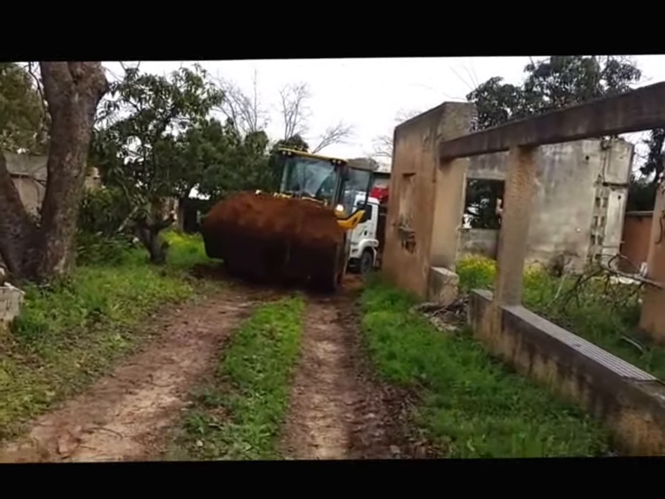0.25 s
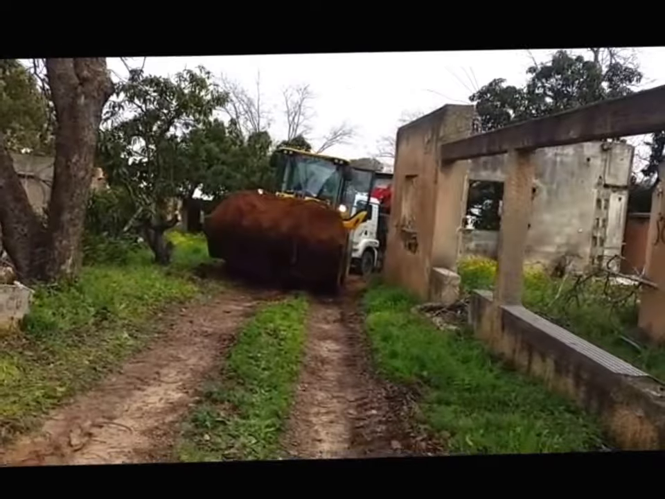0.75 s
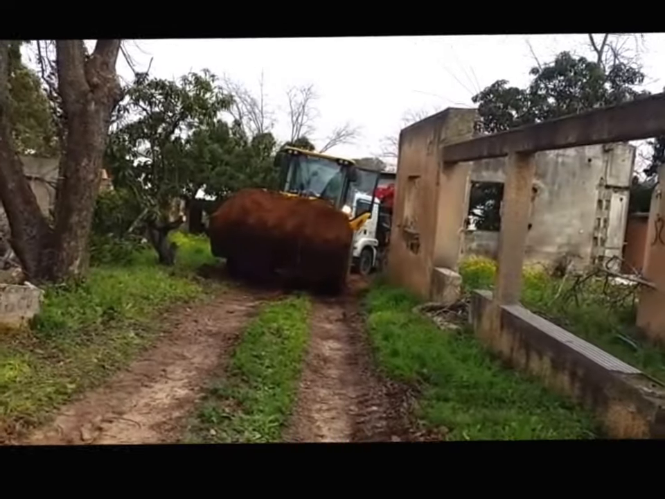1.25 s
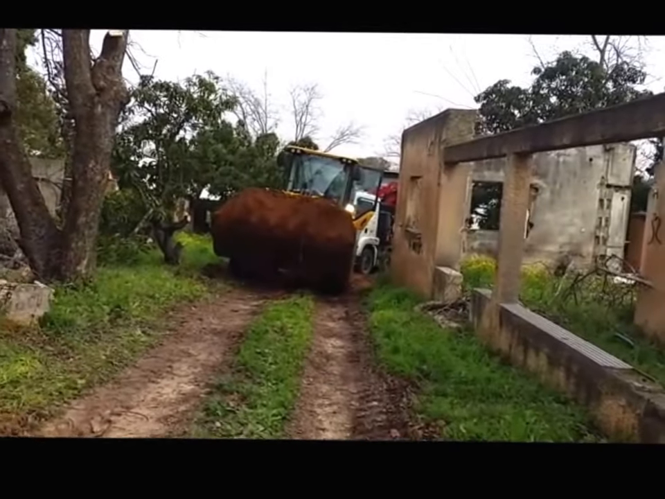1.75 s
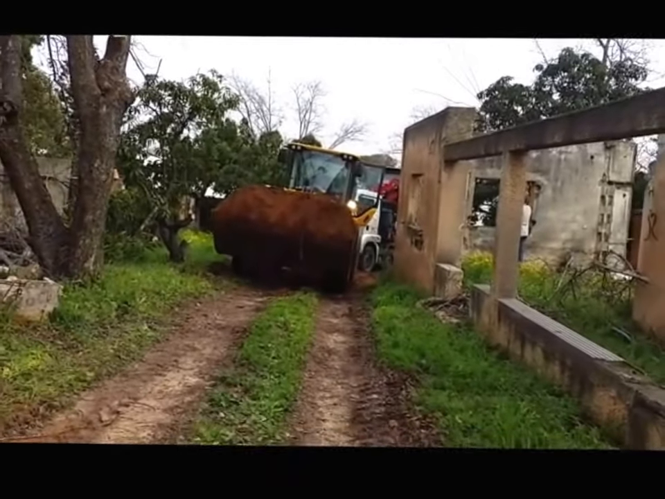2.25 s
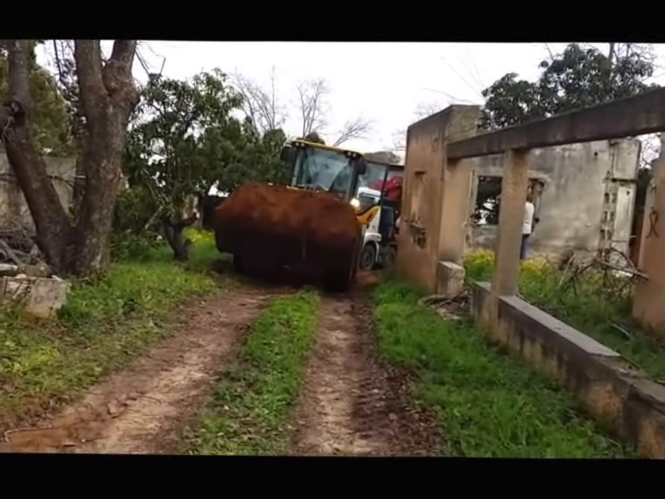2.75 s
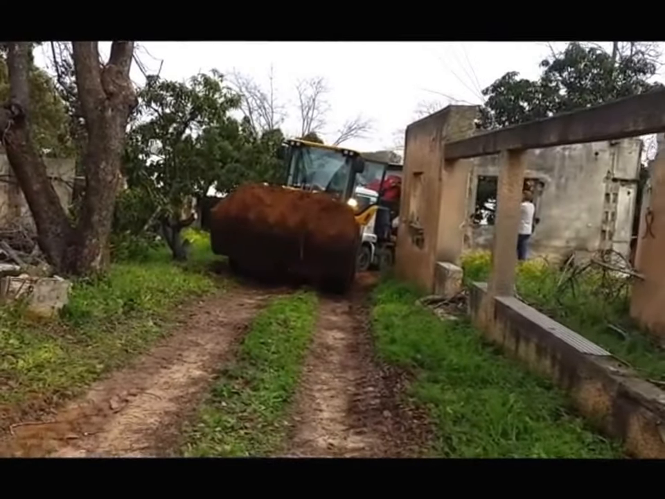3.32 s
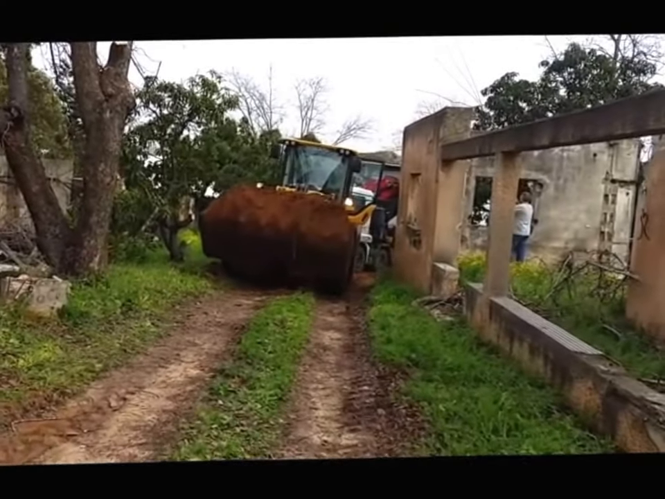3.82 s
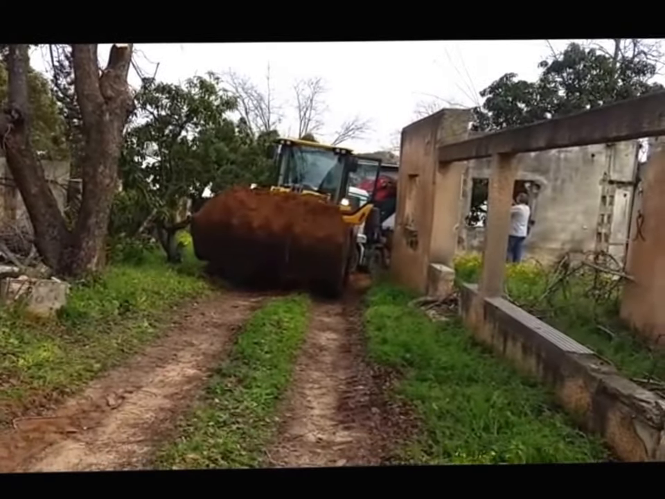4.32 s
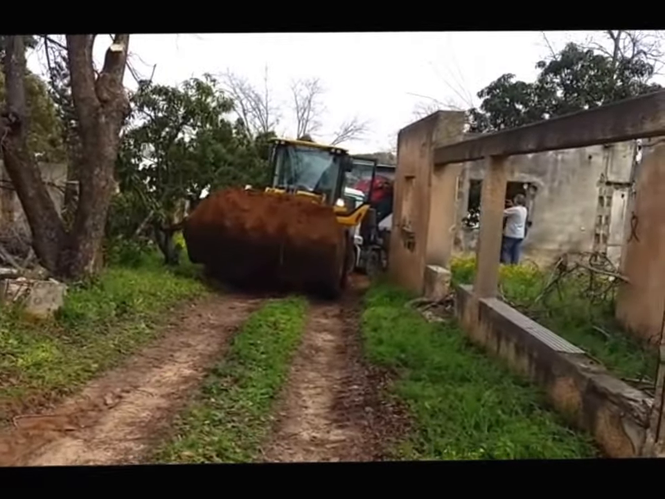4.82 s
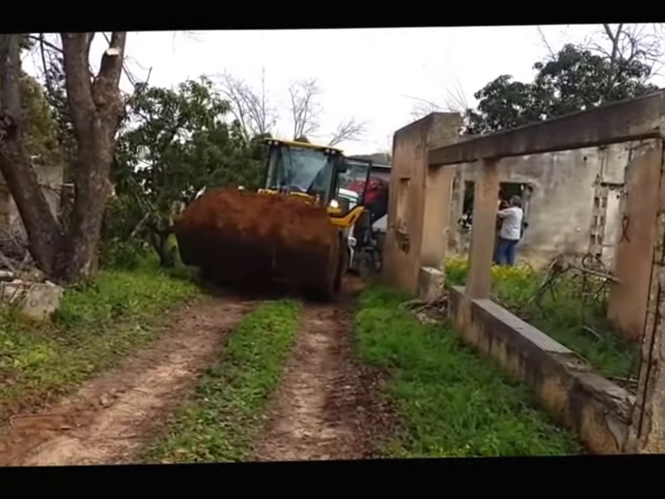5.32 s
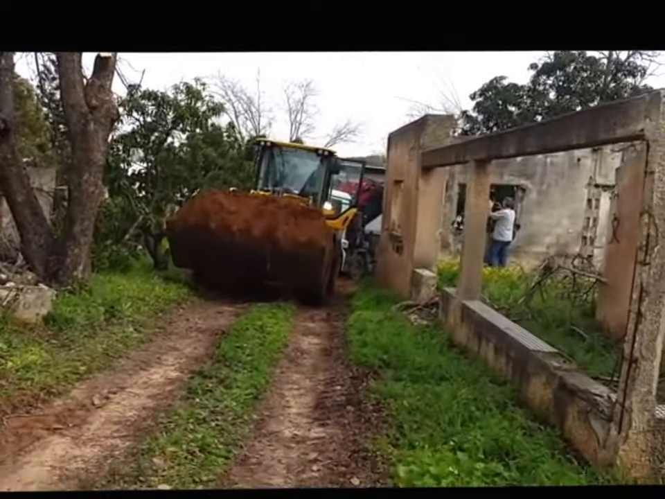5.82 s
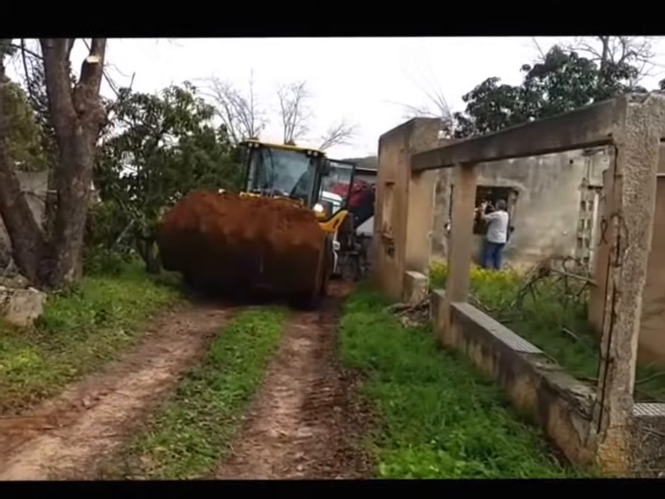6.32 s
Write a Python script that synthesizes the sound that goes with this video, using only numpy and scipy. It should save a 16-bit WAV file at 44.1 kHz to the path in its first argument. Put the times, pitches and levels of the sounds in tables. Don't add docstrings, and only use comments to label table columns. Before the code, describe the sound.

From the start, a big diesel loader runs at a low, slightly slackening speed some way down an outdoor dirt track, its exhaust booming in fast pulses beneath casing rumble, panel clatter and fan roar. A second diesel hums low behind, its speed rising around 1 s, sagging near 2.4 s, rising again by 3.5 s and dipping near 5 s. Hydraulic whine jumps out strongly at about 1 s and fades, returns for a longer hold from 3.2 s, then in short strokes near 4.7 and 5.2 s and again at 6.1 s. Gear tones swell in and out, with a very thin, high turbo whistle. The sound grows gradually, then from 4.6 to 5.6 s the engine revs up and pulls hard, loudest near 5.65 s, easing slightly to the cut at 6.5 s. Bright grass rustles tick close to the hand-held stereo microphone, most clearly at 5.5-5.9 and 6.4 s.

```python
import sys
import numpy as np
from scipy import signal
from scipy.fft import rfft, irfft
from scipy.io import wavfile
from scipy.ndimage import uniform_filter1d

SR = 44100
rng = np.random.default_rng(int(sys.argv[2]) if len(sys.argv) > 2 else 0)


def digitize_waveform(pressure):
    field = np.atleast_2d(pressure).T
    bounded = np.clip(field, -1, 1)
    quanta = np.round(bounded * 32767).astype(np.int16)
    wavfile.write(sys.argv[1], SR, quanta)


def volts_from_decibels(level):
    exponent = np.asarray(level, float) / 20
    return 10 ** exponent


N = 289296
TIME = np.arange(N) / SR
HZ = np.maximum(np.arange(N // 2 + 1) * SR / N, 1)


def curves(table):
    s, *columns = np.transpose(table)
    return [np.interp(TIME, s, c) for c in columns]


def across(table, hz=HZ):
    at_hz, value = np.transpose(table)
    return np.interp(np.log(hz), np.log(at_hz), value)


def swells(rows):
    return sum(db * np.exp(-.5 * ((TIME - s) / width) ** 2) for s, width, db in rows)


def walk(rate):
    k = int(SR / rate)
    steps = np.repeat(rng.standard_normal(N // k + 1), k)
    return 1.5 * uniform_filter1d(uniform_filter1d(steps, k), k)[:N]


def tone(turns, db, waver_db, slip):
    strength = np.sqrt(2) * volts_from_decibels(db + waver_db * walk(9))
    return strength * np.cos(2 * np.pi * turns + slip * walk(11))


def noise(colour, flicker_db):
    low_hz, high_hz = colour[0][0], colour[-1][0]
    gain = volts_from_decibels(across(colour)) * (HZ > .8 * low_hz) * (HZ < 1.1 * high_hz)
    wave = rfft(rng.standard_normal(N)) * gain
    out = 0
    for octave in np.arange(np.floor(np.log2(low_hz)) - 1, np.log2(high_hz) + 1):
        band = np.clip(1 - np.abs(np.log2(HZ) - octave), 0, 1)
        out = out + irfft(wave * band, N) * volts_from_decibels(flicker_db * walk(5))
    return out / np.std(out)


def exhaust(turns, pull, near_db):
    order_levels = {"six": (-29.5, 1.03), "nine": (-30, 0.29), "twelve": (-37, 0.3), "uneven": (-41, 0.94)}
    echoes = {"six": [(3.0, 1, -6.5), (4.6, 0.27, 3.5), (5.0, 0.11, -8), (5.4, 0.28, -4), (6.0, 0.11, 4)],
              "nine": [(2.0, 0.24, -11), (2.2, 0.29, -10), (3.1, 0.21, -6.5), (4.3, 0.31, 2.5),
              (4.8, 0.07, -11), (5.15, 0.054, 4.5), (5.45, 0.077, -3), (6.1, .45, -5.5), (6.55, 0.28, -18)],
              "twelve": [(0.0, .1, -3), (.4, 0.075, -4.5), (3.6, 0.61, 2.5), (4.05, 0.11, -4.5),
              (4.9, 0.18, -7.5), (5.2, .08, 7), (5.4, 0.069, -5), (6.0, 0.15, -2)],
              "uneven": [(1.3, 0.13, 3.5), (2.4, 0.087, -8.5), (3.8, 0.19, 2), (4.0, 0.06, -11),
              (5.6, .3, 0)]}
    # multiple of the cycle, level/dB
    uneven_orders = [(3, -29.5), (5, -16), (7, -2.5), (8, -10.5), (10, -0.5), (11, -10), (13, -20),
                     (14, -9), (15, -11.5), (16, -25), (17, -12), (18, -15)]

    def lag(order):
        fixed_turns = .5 - .004 * (order - 6) ** 2 + .3 * (order % 2) * np.sin(order ** 2 + .95)
        return fixed_turns + .06 * walk(.7)

    heard_db = {name: db + growth * near_db + swells(echoes[name])
                for name, (db, growth) in order_levels.items()}
    out = 0
    for k, name in ((6, "six"), (9, "nine"), (12, "twelve")):
        out = out + tone(k * turns + lag(k), heard_db[name], .7, .08)
    for k, db in uneven_orders:
        pulling_db = 2.0 * pull * (-1) ** k
        out = out + tone(k * turns + lag(k), heard_db["uneven"] + db + pulling_db, 2.2, 0.22)
    return out


def roar(turns, near_db):
    # f/Hz, level/(dB per Hz)
    casing_colour = [(20, -4), (50, -4), (100, 6), (190, 3.5), (290, -8), (430, -15.5), (540, -4),
                     (640, -8.5), (760, -10), (900, -18.5), (1100, -23.5)]
    # f/Hz, level/(dB per Hz)
    clatter_colour = [(700, -40), (900, -9.5), (1030, -3), (1170, 0), (1320, -1.5), (1420, -3.5),
                      (1650, -4.5), (2000, -6.5), (2230, -6), (2730, -14), (4120, -16.5), (4720, -21),
                      (6000, -50.5), (9000, -45)]
    # f/Hz, skirt/Hz, level/dB
    panel_modes = [(1053, 260, -13.5), (1279, 140, -16.5), (2165, 120, -17), (2326, 160, -14.5)]
    # f/Hz, level/(dB per Hz)
    hiss_colour = [(4000, -12), (5000, -3.5), (6000, -13.5), (7000, -15.5), (7700, -25), (9000, -17),
                   (11000, -11), (13500, 0), (15700, -0.5)]
    throb = volts_from_decibels(0.4 * np.cos(2 * np.pi * 6 * turns) + .5 * np.cos(2 * np.pi * turns))
    casing = volts_from_decibels(-35.5 + .9 * near_db) * noise(casing_colour, 0.94)
    clatter = noise(clatter_colour, 0.36)
    for hz, skirt, db in panel_modes:
        ring = noise([(hz - skirt, -25), (hz, 0), (hz + skirt, -25)], 0.75)
        clatter = clatter + volts_from_decibels(db + 2.5 * walk(3.26)) * ring
    hiss = volts_from_decibels(-59 + 1.45 * near_db) * noise(hiss_colour, 0.3)
    return throb * (casing + volts_from_decibels(-46.5 + near_db) * clatter) + hiss


def pump(turns, pull):
    # t/s, hold/s, level/dB
    strokes = [
        (.1, 0.41, -53),
        (0.98, 0.64, -38.5),
        (3.2, 1.05, -41.5),
        (4.71, 0.052, -45.5),
        (5.2, 0.16, -42),
        (6.1, 0.6, -41),
    ]
    idle_db, rise_db_s, fall_db_s = -55, 93, 21
    stroke_db = []
    for s, hold, db in strokes:
        before, after = np.maximum(s - TIME, 0), np.maximum(TIME - s - hold, 0)
        stroke_db.append(db - rise_db_s * before - fall_db_s * after)
    whine_db = np.maximum(np.max(stroke_db, axis=0), idle_db)
    return tone(35.44 * turns, whine_db, 0.6, 0.25 + .15 * pull)


def gears(turns, pull, near_db):
    mesh_orders = (32, 38, 46.8, 53.2)
    # resting level/dB, then loads as t/s, width/s, gain/dB
    mesh_loads = [
        (-67.5, [(.9, 0.068, -2.5), (5.35, 0.15, 18), (6.0, 0.12, 23)]),
        (-64, [(1.25, .15, 8), (2.1, 0.38, 16), (3.2, 0.34, 10.5), (4.15, .35, 10), (5.35, .12, 18)]),
        (-68, [(2.05, .2, 12), (3.0, 0.17, 17), (3.8, .2, 15.5), (4.3, .15, 8), (4.85, 0.43, 19.5), (5.7, .13, 7), (6.4, 0.28, 18.5)]),
        (-67.5, [(.3, 0.28, 5.5), (1.3, 0.6, 13), (3.25, 0.38, 14.5), (6.45, .2, 0)]),
    ]
    # multiple of the cycle, level/dB at mean distance
    whine_orders = [(20, -64.5), (21, -68), (22, -70), (24, -61), (28, -62.5), (34, -80.5), (41, -56.5),
                    (42, -58.5), (45, -69.5), (70.2, -63), (87.9, -57)]
    out = 0
    for k, (rest_db, loads) in zip(mesh_orders, mesh_loads):
        out = out + tone(k * turns, rest_db + swells(loads), 0.89 + 4.3 * pull, 0.32 + 0.9 * pull)
    swell_db = 1.1 * (near_db - near_db.mean()) - 6.9 * pull
    for k, db in whine_orders:
        whine_db = db + swell_db + 2.0 * walk(2.36)
        out = out + tone(k * turns, whine_db, 0.41 + 1.5 * pull, 0.23 + 0.3 * pull)
    return out


def turbo(near_db):
    # t/s, f/Hz
    whistle = [
        (0, 14650),
        (1.5, 14550),
        (2.3, 14120),
        (3.2, 13997),
        (4.5, 13950),
        (5.1, 15650),
        (5.3, 16200),
        (6.56, 16400),
    ]
    hz = curves(whistle)[0] + 45 * walk(60)
    return tone(np.cumsum(hz) / SR, -78 + 1.5 * near_db, 4.0, .6)


def grass():
    # t/s, rise and fall/s, hold/s, level/dB
    rustles = [(0.295, 0.011, 0.03, -63), (0.335, .03, .1, -68), (2.923, 0.0076, 0.039, -66),
               (3.705, 0.013, .03, -61.5), (4.424, .01, .03, -63), (5.203, .01, 0.047, -57),
               (6.233, .004, 0.0035, -54), (6.376, .003, .004, -45), (0.664, 0.004, 0.011, -62),
               (0.66, .12, .15, -66.5), (5.57, .07, .3, -55), (5.567, 0.015, .035, -51),
               (5.628, .01, .035, -51), (5.745, 0.008, 0.045, -53), (5.82, 0.01, 0.05, -48.5)]
    # f/Hz, level/(dB per Hz)
    blade_colour = [(5500, -40), (7700, -27), (9000, -17.5), (11000, -11.5), (13500, -4.5), (15700, 0)]
    swish = 0
    for s, rise, hold, db in rustles:
        outside = np.maximum(np.maximum(s - TIME, TIME - s - hold), 0)
        swish = swish + volts_from_decibels(db) * np.exp(-outside / rise)
    return swish * volts_from_decibels(3.2 * walk(300)) * noise(blade_colour, 1.9)


def idler(near_db):
    # t/s, firing f/Hz
    firing = [(0.0, 30.8), (.8, 32.9), (1.25, 32.8), (1.8, 30.7), (2.15, 28.9), (2.45, 28.9), (3.35, 35.3),
              (3.85, 35.6), (4.2, 33.9), (4.65, 29.3), (5.0, 28.7), (5.4, 33.3), (5.75, 34.0), (6.0, 33.4),
              (6.56, 33.8)]
    hz = curves(firing)[0]
    turns, faster = np.cumsum(hz) / SR, hz - 32.65
    first = tone(turns, -37.5 + 0.9 * faster + near_db, 0.47, 0.068)
    return first + tone(2 * turns, -41 + 1.5 * faster + near_db, 1.4, 0.16)


def microphone(tones, direct, scattered):
    # f/Hz, left minus right level/dB
    balance = [(60, 0), (200, 0), (380, 3.5), (700, 3), (1290, 2), (2380, 3.5), (4400, 9.5), (6000, 1),
               (9500, 33.5), (12500, 4.5), (15000, -0.5)]
    # f/Hz, part/(0-1)
    shared_part = [(60, 0.75), (200, 0.83), (350, 0.9), (640, 0.68), (1100, 0.17), (1500, 0.37),
                   (2500, 0.45), (5000, 0.46), (8000, 0.22), (10000, .2), (12500, 0.79)]
    # f/Hz, phase/rad
    left_lead = [(30, .1), (150, .15), (350, .4), (780, .8), (1120, 1.3), (1460, 2.2), (2330, .6),
                 (2840, 1.2), (4650, 0), (7060, .1), (9500, 1.6), (12000, .3), (16000, 0)]
    margin = 4096
    size = N + 2 * margin
    fade = signal.windows.tukey(size, 2 * margin / size)

    def mirrored(x):
        return rfft(np.pad(x, margin, "reflect", reflect_type="odd") * fade)

    tones, direct, scattered = mirrored(tones), mirrored(direct), mirrored(scattered)
    bins_hz = np.maximum(np.arange(size // 2 + 1) * SR / size, 1)
    share = np.clip(across(shared_part, bins_hz), 0, 1)
    tilt = volts_from_decibels(across(balance, bins_hz) / 2)
    lead = np.exp(1j * across(left_lead, bins_hz))
    left = tilt * (tones + direct)
    right = (tones + share * direct + np.sqrt(1 - share ** 2) * scattered) / lead / tilt
    top_hz = 15850
    return irfft(np.array([left, right]) * (bins_hz < top_hz), size)[:, margin:-margin]


def scene():
    # t/s, cycle f/Hz
    engine_speed = [(0.0, 15.31), (0.4, 15.19), (1.0, 15.2), (1.4, 15.15), (1.8, 14.97), (2.6, 14.78),
                    (4.3, 14.75), (4.6, 14.92), (5.2, 15.83), (5.4, 16.3), (5.6, 16.56), (6.0, 16.47),
                    (6.56, 16.17)]
    # t/s, clatter level/dB
    approach = [
        (0, -53),
        (.7, -51),
        (1.5, -50),
        (2.2, -49),
        (3.4, -48),
        (4.5, -46),
        (5.2, -44),
        (5.65, -42),
        (6.56, -43),
    ]
    hz = curves(engine_speed)[0]
    turns = np.cumsum(hz) / SR
    pull = np.clip(hz - 15.3, 0, 1)
    near_db = curves(approach)[0]
    near_db = near_db - near_db.mean()
    tones = exhaust(turns, pull, near_db) + pump(turns, pull) + gears(turns, pull, near_db)
    tones = tones + turbo(near_db) + idler(near_db)
    direct, scattered = (roar(turns, near_db) + grass() for _ in range(2))
    return microphone(tones, direct, scattered)


def low_pass(x):
    return signal.sosfilt(signal.butter(12, 15900, fs=SR, output="sos"), x)


def record(dry):
    mix = dry * np.sin(np.minimum(TIME / .006, 1) * np.pi / 2) ** 2
    return low_pass(mix)


dry = scene()
out = record(dry)
digitize_waveform(out)
```